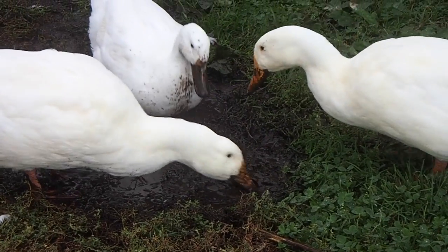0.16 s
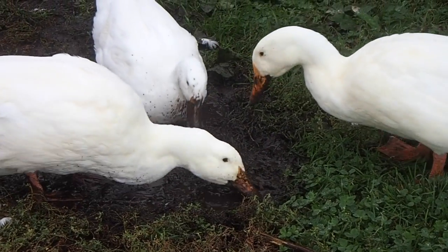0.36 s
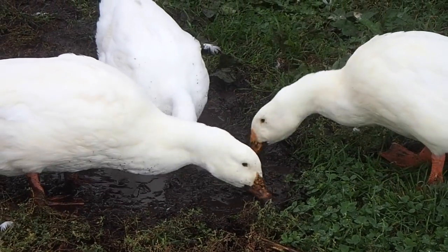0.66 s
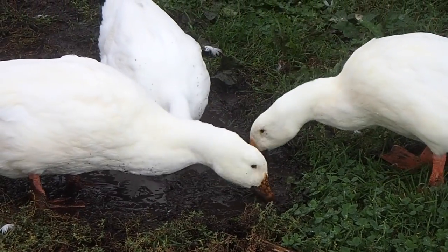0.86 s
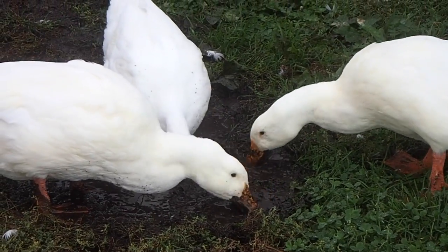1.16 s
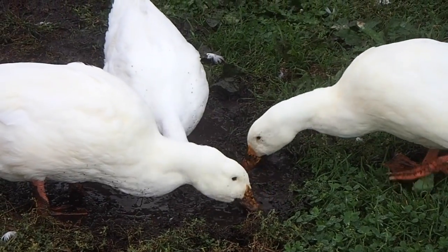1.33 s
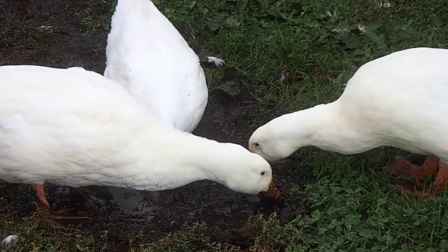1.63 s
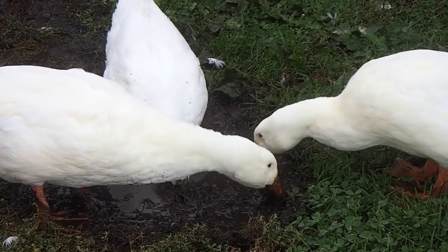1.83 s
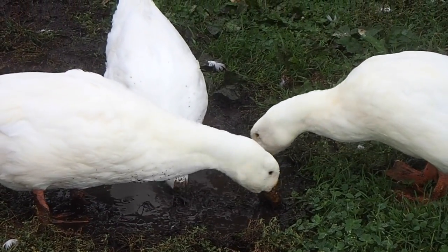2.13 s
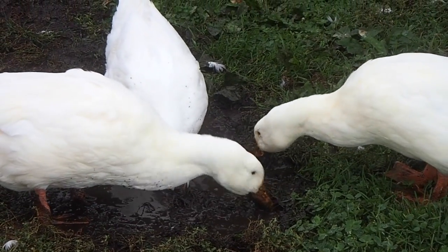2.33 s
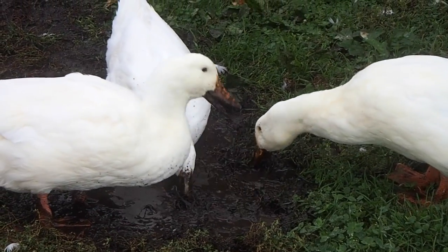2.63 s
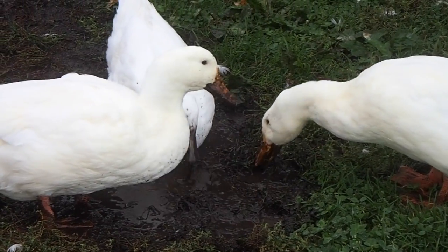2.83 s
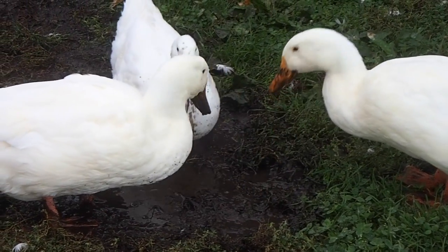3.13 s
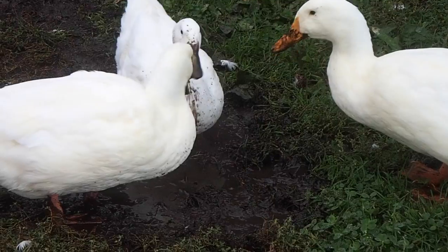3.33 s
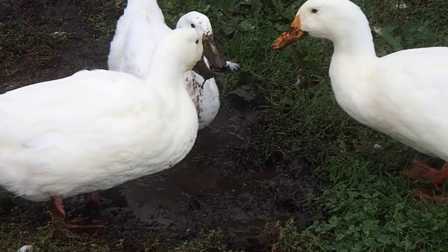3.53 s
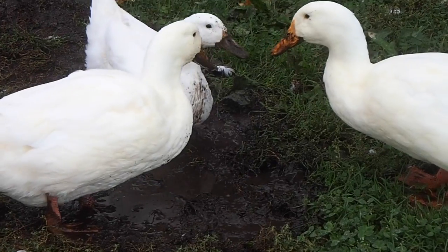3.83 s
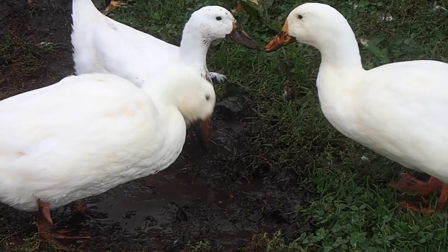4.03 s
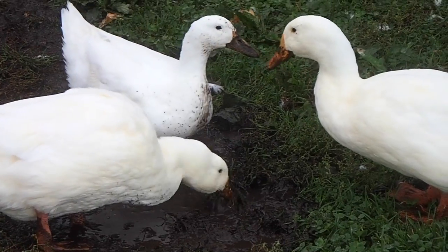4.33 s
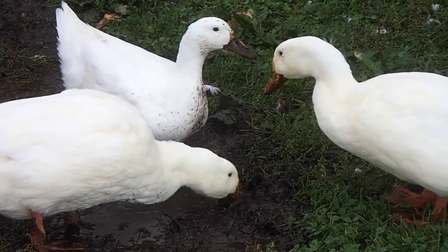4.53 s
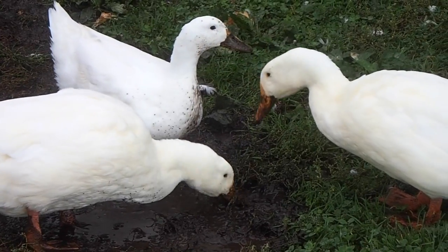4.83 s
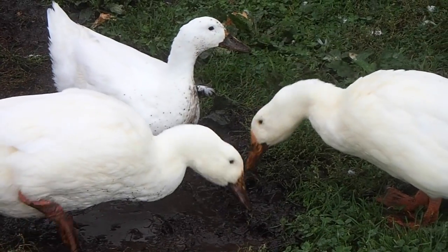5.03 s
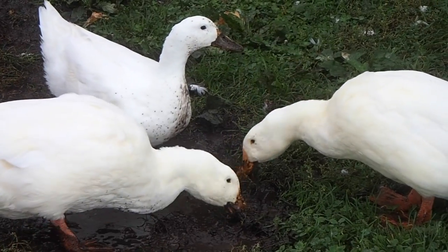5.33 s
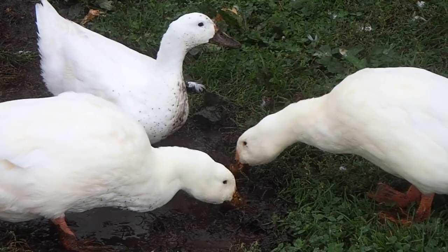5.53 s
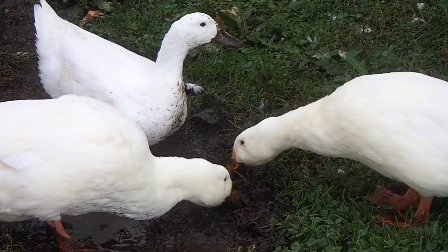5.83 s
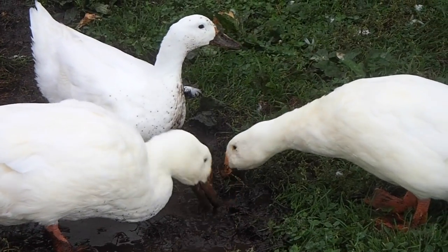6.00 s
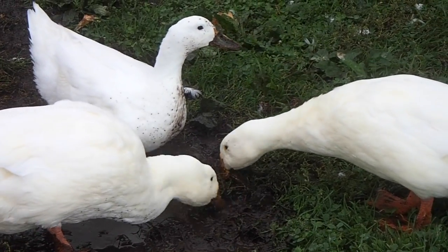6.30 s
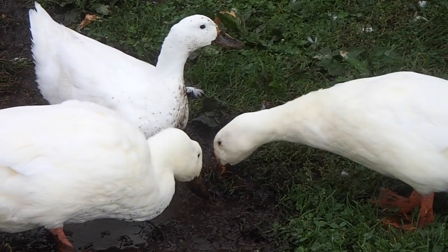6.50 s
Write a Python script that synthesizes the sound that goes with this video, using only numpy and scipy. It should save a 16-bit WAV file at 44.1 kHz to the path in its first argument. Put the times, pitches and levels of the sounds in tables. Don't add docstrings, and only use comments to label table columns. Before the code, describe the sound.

Three ducks dabble in a muddy puddle outdoors, very close to a small camera. Sharp wet smacks, plops and droplets build into a dense bout, pause for over a second while a drake rasps softly, then return in two more bouts. Far traffic rumbles, wind puffs lightly at the microphone and the lens motor ticks faintly early on.

```python
import sys
import numpy as np
from scipy import signal
from scipy.io import wavfile
from scipy.ndimage import uniform_filter1d

SR = 44100
rng = np.random.default_rng(int(sys.argv[2]) if len(sys.argv) > 2 else 0)


def store_pcm(level_fs):
    pcm = np.round(np.clip(level_fs, -1, 1) * 32767).astype(np.int16)
    wavfile.write(sys.argv[1], SR, np.atleast_2d(pcm).T)


def ratio_of_db(decibels):
    return 10 ** (np.asarray(decibels, float) / 20)


N = 293706

# pitch_hz, gain_db
CAVITY = [(2000, -9.5), (2800, -17), (3400, -12), (4180, -27.5), (4650, -6.5), (5300, -4), (5900, -8.5),
          (6350, -12), (7200, -15.5), (8000, -11.5), (9200, -25.5), (15600, -41.5), (16900, -70)]


def evened(x):
    return x / np.sqrt(np.mean(x ** 2) + 1e-20)


def read(points, hz):
    f, value = np.transpose(points)
    return np.interp(np.log(hz + 1), np.log(f + 1), value)


def add(mix, s, sound):
    part = mix[..., round(s * SR):][..., :sound.shape[-1]]
    part += sound[..., :part.shape[-1]]


def resonate(x, hz, width):
    turn = np.exp(2j * np.pi * np.cumsum(hz * np.ones(len(x))) / SR)
    r = np.exp(-np.pi * width / SR)
    return 2 * (turn * signal.lfilter([1 - r], [1, -r], x / turn)).real


def coloured(x, points):
    hz = abs(np.fft.fftfreq(4096, 1 / SR))
    log_gain = np.log(ratio_of_db(uniform_filter1d(read(points, hz), size=7, mode="wrap")))
    taps = np.fft.ifft(np.exp(np.conj(signal.hilbert(log_gain)))).real[:2048]
    return signal.oaconvolve(x, taps[None], axes=1)[:, :N]


def placed(x, pan_db):
    return x * ratio_of_db(np.array([[pan_db / 2], [-pan_db / 2]]))


def burst(t, length, hz, noise, wetness):
    shape = t / length * np.exp(1 - t / length)
    tone = np.sin(2 * np.pi * hz * t * (1 + 0.0055 * t / length))
    fuzz = evened(resonate(noise, hz, 0.44 * hz)) / np.sqrt(2)
    wet = np.clip(wetness * length / 0.00088, 0, 1)
    return shape * ((1 - wet) * tone + wet * fuzz), shape


def yard():
    # pitch_hz, level_db
    rumble_curve = [(25, -12), (70, -16.5), (120, 0), (200, -10), (300, -8), (700, -15), (1400, -18),
                    (2600, -42.5)]
    # pitch_hz, likeness (0 to 1)
    likeness = [(60, 0.41), (125, 1), (250, 0.86), (1000, 0.96), (2500, 0.76)]
    # pitch_hz, width_hz, level_db, start_s, end_s
    engines = [
        (71.2, 11.6, -56, 0.048, 7),
        (124, 49, -58, 0.17, 7),
        (161.3, 12.4, -58, 0.17, 3.1),
        (291, 27, -59.5, 0.064, 3.7),
        (486, 3.9, -59, 0.5, 1.01),
    ]
    frames, hz = N // 512 + 5, np.fft.rfftfreq(2048, 1 / SR)
    a, b, c, d, patches = rng.standard_normal((frames, 1025, 5)).T
    patches = evened(uniform_filter1d(uniform_filter1d(patches, 4, 0), 12, 1))
    swell = evened(uniform_filter1d(rng.standard_normal(frames), 30))

    same = np.clip(read(likeness, hz), -1, 1)[:, None]
    left = a + 1j * b
    right = same * left + np.sqrt(1 - same ** 2) * (c + 1j * d)
    z = np.array([left, right])
    z *= ratio_of_db(read(rumble_curve, hz)[:, None] + 2.0 * patches + 0.56 * swell)
    out = ratio_of_db(-37.0) * evened(signal.istft(z, nperseg=2048, noverlap=1536)[1][:, :N])

    now = np.arange(N) / SR
    for f, width, db, start, end in engines:
        fade = np.clip(np.minimum(now - start, end - now) / 0.14 + 1, 0, 1)
        out += ratio_of_db(db + 15) * evened(resonate(rng.standard_normal(N), f, width)) * fade
    return out


def crackle():
    # time_s, level_db
    busyness = [(0, -51), (.6, -45), (2.2, -39.5), (2.8, -51.5), (4.15, -55), (4.5, -39), (4.85, -50),
                (5.15, -48), (5.6, -37.5), (6.1, -46.5), (6.66, -45.5)]
    # pitch_hz, gain_db
    mud_curve = [(700, -34), (1200, -8), (5000, -4.5), (9000, -4.5), (15700, 12), (15860, -37)]
    clumps = uniform_filter1d(uniform_filter1d(rng.standard_normal(N), 300), 300)
    clumps = np.clip(evened(clumps), -2, 1.6)
    struck = rng.random(N) < 700 / SR
    size = ratio_of_db(3.5 * np.minimum(rng.exponential(1, N), 2.8)) * struck * ratio_of_db(5.0 * clumps)

    kind, t, grains = rng.integers(0, 24, N), np.arange(300) / SR, np.zeros((2, N))
    for k, hz in enumerate(np.geomspace(900, 14000, num=24)):
        length = rng.uniform(0.23, 4.7) / hz
        grain = burst(t, length, hz, rng.standard_normal(300), wetness=0.79)[0]
        train = signal.oaconvolve(size * (kind == k), grain / np.linalg.norm(grain))[:N]
        grains += placed(train, 0.32 * rng.standard_normal())

    bright = np.diff(rng.standard_normal((2, N + 1)))
    smear = (rng.standard_normal(N) + 1.5 * bright) * ratio_of_db(1.3 * clumps)
    s, db = np.transpose(busyness)
    busy_db = np.interp(np.arange(N) / SR, s, db)
    smear_db = 0.35 * (busy_db + 49.5) - 39.5
    return coloured(ratio_of_db(busy_db + 6.5) * evened(grains) + ratio_of_db(smear_db) * smear, mud_curve)


def focus(count):
    # pitch_hz, peak_db
    body_modes = [(3250, -43), (2500, -49), (5300, -44), (8000, -54)]
    start_s, step_s = 0.0506, 1.001 / 15
    out, t = np.zeros((2, N)), np.arange(400) / SR
    for k, noise in enumerate(rng.standard_normal((count, 400))):
        tick = np.zeros(len(t))
        for hz, db in body_modes:
            tick += ratio_of_db(db - read(CAVITY, hz)) * burst(t, 0.0007, hz, noise, wetness=0.83)[0]
        add(out, start_s + k * step_s - .001, placed(tick, 0.1))
    return out


def rasp(start, length, db, hz, pipe_hz):
    # factor on the throat pitch, width_hz, level_db
    throat_modes = [(1.0, 200, 3), (1.3, 300, -1), (1.7, 350, -5), (2.1, 350, -6)]
    top, end = start + 0.366 * length, start + length
    flaps_per_s = 71
    t = np.arange(start, end, 1 / SR)
    swell_db = np.interp(t, [start, top - .1 * length, top + .15 * length, end], [-9, -1, -1, -16])
    effort_db = db + swell_db
    wobble = evened(uniform_filter1d(rng.standard_normal(len(t)), 500))
    turns = np.cumsum(flaps_per_s * ratio_of_db(.12 * (effort_db + 46)) * (1 + .12 * wobble)) / SR
    phase = turns % 1
    strength, detune, pipe_db = rng.standard_normal((3, 40))[:, turns.astype(int)]
    puff = .27 + ratio_of_db(1.4 * strength) * np.sin(np.pi * phase ** .7) ** 2

    slide = hz * (1 + .34 * (phase - .62) + .04 * wobble + .06 * detune + .008 * swell_db)
    whistle = np.sqrt(2) * np.sin(2 * np.pi * np.cumsum(slide) / SR)
    pipe_slide = pipe_hz * (1 + 0.041 * wobble + 0.147 * (phase - .7))
    pipe_level = phase * ratio_of_db(6.5 + 3.0 * pipe_db + .5 * swell_db)
    windpipe = np.sin(2 * np.pi * np.cumsum(pipe_slide) / SR) * pipe_level

    air, throat = rng.standard_normal(len(t)), np.zeros(len(t))
    for f, width, mode_db in throat_modes:
        ring = resonate(resonate(air, f * slide, width), f * slide, 2 * width)
        throat += ratio_of_db(mode_db + (f - 2.0) * .5 * swell_db) * evened(ring)
    hiss = resonate(resonate(air, 5200 + 200 * wobble, 500), 5450 + 200 * wobble, 500)
    nostrils = ratio_of_db(.9 * swell_db) * evened(hiss)
    voice = evened(puff * (2.1 * (whistle + windpipe) + throat) + np.sqrt(puff) * nostrils)
    return ratio_of_db(effort_db + 17.5) * voice * signal.windows.tukey(len(t), .15)


def drake():
    # start_s, length_s, effort_db, throat_hz, windpipe_hz
    calls = [(0.171, 0.083, -56.5, 1600, 2040), (0.263, 0.093, -50.5, 1498, 1900),
             (0.462, 0.096, -48.5, 1474, 1800), (0.698, 0.076, -51, 1565, 2150),
             (0.898, 0.15, -53.5, 1346, 1800), (1.186, 0.081, -48.5, 1560, 1900),
             (1.922, 0.036, -53, 1670, 2040), (2.231, 0.034, -51, 1770, 2060),
             (2.456, 0.057, -53, 1530, 2040), (2.65, 0.084, -49, 1484, 2450),
             (2.841, 0.062, -53, 1380, 2000), (3.012, 0.077, -46, 1500, 2170),
             (3.058, 0.084, -50, 1700, 2060), (3.212, 0.086, -46.5, 1678, 2050),
             (3.496, 0.089, -45, 1750, 2080), (3.621, 0.087, -52.5, 1360, 2350),
             (3.698, 0.12, -40.5, 1620, 2084), (4.006, 0.073, -46.5, 1700, 2186),
             (4.141, 0.09, -46.5, 1400, 1820), (4.36, 0.0814, -47, 1400, 2130),
             (4.545, 0.089, -52, 1422, 1850), (4.762, 0.11, -46.5, 1660, 2200),
             (4.98, 0.089, -52.5, 1480, 2200), (5.109, 0.099, -49, 1600, 2050),
             (5.285, 0.093, -52, 1720, 2040), (5.722, 0.06, -51, 1530, 2040),
             (6.086, 0.085, -56.5, 1523, 2040), (6.341, 0.079, -58.5, 1400, 2040),
             (6.574, 0.082, -52, 1465, 2010)]
    voice = np.zeros(N)
    for call in calls:
        add(voice, call[0], rasp(*call))
    t = np.arange(4000) / SR
    tail = rng.standard_normal((2, 4000)) * ratio_of_db(-60 * t / 0.76) * (t > .003)
    tail /= np.linalg.norm(tail[0])
    return voice + ratio_of_db(-47.0) * signal.oaconvolve(voice[None], tail, axes=1)[:, :N]


def wind():
    # time_s, level_db
    puff_rows = [(0.2, -55), (0.82, -40.5), (0.97, -48), (1.37, -39), (2.13, -47), (2.28, -42),
                 (2.6, -42.5), (3.12, -57), (3.27, -42), (4.22, -41), (5.169, -47)]
    # pitch_hz, gain_db
    gust_curve = [(15, -17), (45, 11.5), (150, -1.5), (400, -42), (1500, -105)]
    now = np.arange(N) / SR
    puffs = sum(ratio_of_db(db) * np.exp(-((now - s) / 0.058) ** 2) for s, db in puff_rows)
    lumps = evened(uniform_filter1d(uniform_filter1d(rng.standard_normal(N), 2500), 2500))
    air = evened(coloured(rng.standard_normal((2, N)), gust_curve)) * ratio_of_db(np.array([[-1.5], [1.5]]))
    return air * (puffs + ratio_of_db(-57.0 + 4.9 * lumps))


def ticks():
    # time_s, peak_db, pitch_hz
    films = [(0.2597, -44, 8200), (0.5697, -41, 8160), (0.898, -41, 5100), (1.12, -39.5, 8200),
             (1.1422, -37, 8150), (1.2952, -35.5, 8150), (1.388, -41, 3450), (1.425, -35, 7500),
             (1.567, -40, 5280), (1.809, -37.5, 5400), (1.932, -37, 5500), (2.206, -30.5, 5520),
             (2.5519, -39.5, 3300), (3.8164, -46, 8400), (4.27, -40.5, 7800), (4.317, -43, 5430),
             (5.1972, -46.5, 10900), (5.3404, -39, 6460), (5.684, -32, 5300), (5.7593, -39, 7800),
             (5.777, -34, 8000), (5.8237, -42, 2880), (5.899, -49, 9500), (5.9697, -47, 2860),
             (2.79, -47.5, 2840), (6.2672, -46, 14470), (6.284, -44, 7750), (6.3094, -40, 8100),
             (4.282, -48, 2380), (6.546, -39, 8000), (0.3064, -47, 7800), (0.532, -47, 8050),
             (.5475, -48, 7840), (0.5633, -48, 7000), (0.6494, -44, 7450), (0.706, -47.5, 8600),
             (1.96, -37, 6200), (1.2471, -51, 9800), (1.5896, -47, 7500), (2.0142, -42, 7260),
             (.4865, -57, 8900), (4.229, -61, 8800), (4.256, -48, 7000), (4.6472, -42, 6400),
             (2.149, -46, 5500), (5.7502, -40, 7500), (6.145, -48, 8050), (6.2067, -50, 8800),
             (6.4615, -50, 7000), (6.471, -45, 7760), (6.506, -40, 5500), (1.8724, -40, 5400)]
    out, t = np.zeros((2, N)), np.arange(500) / SR
    for (s, db, hz), noise in zip(films, rng.standard_normal((len(films), 2, 500))):
        snap, shape = burst(t, 0.00078, hz, noise[1], wetness=0.72)
        splash = ratio_of_db(-19.0) * noise[0] * shape
        sound = (snap + splash) / ratio_of_db(max(read(CAVITY, hz), -26))
        add(out, s - .0006, placed(ratio_of_db(db + 11.5) * sound, 1.1 * noise[0, 0]))
    return out


def spatter():
    # time_s, peak_db, pitch_hz
    bubbles = [(0.584, -31.5, 3400), (1, -36, 3100.0), (1.046, -33, 3400), (1.049, -45, 1130),
               (1.0517, -37, 3450), (1.1427, -40, 3190.0), (1.224, -42, 2810), (1.2848, -39, 3380.0),
               (1.2857, -46, 1000), (1.3094, -34, 815), (1.3178, -38, 2980), (1.32, -33, 1800),
               (1.586, -44, 3330), (1.6525, -42, 2990.0), (1.658, -39, 2800), (1.6637, -40, 3360),
               (1.6986, -40.5, 2690.0), (1.718, -48, 3380.0), (1.872, -35, 3420), (1.931, -33, 1810.0),
               (1.961, -38, 1340.0), (1.9791, -37, 3430), (2.0886, -37, 1040), (2.161, -44, 1250),
               (2.251, -36, 1740.0), (2.2902, -50, 2730.0), (2.368, -49, 2760), (2.3799, -37.5, 1150),
               (2.4794, -35, 1930), (4.34, -33.5, 1800), (4.3862, -29.5, 2550), (4.3952, -32, 1460),
               (4.3982, -48, 2430.0), (4.4044, -40, 1360), (4.4073, -38, 1490), (4.425, -45, 1270.0),
               (4.4617, -39, 3200), (4.469, -42, 1160.0), (4.6246, -47, 3060), (4.726, -32.5, 3230),
               (5.3153, -47, 3470.0), (5.3346, -38, 2950.0), (5.371, -32, 3300), (5.371, -38, 1690),
               (5.376, -38.0, 3400.0), (5.4397, -27.5, 3400.0), (5.4476, -41, 2110.0), (5.562, -36, 3340.0),
               (5.5812, -41, 2420), (5.5818, -35, 2130), (5.651, -32.5, 3500), (5.679, -34.0, 1740.0),
               (5.85, -27.5, 3170), (5.8635, -33, 1230), (5.872, -36, 1970), (5.9811, -46, 3540),
               (6.523, -35, 1690), (6.549, -44, 2610.0)]
    # time_s, peak_db, pitch_hz
    droplets = [(0.2627, -39, 7700), (0.3336, -29, 7250), (0.765, -41, 10200), (0.9957, -33.0, 7000),
                (0.9998, -24, 5340.0), (1.081, -32, 7860), (1.14, -48, 13700), (1.1989, -39, 8000),
                (1.22, -34, 7750.0), (1.2205, -24.5, 4980), (1.2853, -49, 14100.0), (1.3084, -41, 7800.0),
                (1.382, -36, 7450), (1.422, -43.5, 14470.0), (1.6637, -34, 6550), (1.6924, -29, 5100),
                (1.7847, -28.5, 5440), (1.8369, -37, 8070.0), (1.8504, -33, 5400.0), (1.8728, -32, 7050),
                (1.892, -38, 7800), (1.978, -27, 5440), (1.9971, -44.0, 10420.0), (2.1047, -26, 5300),
                (2.2309, -40, 7670.0), (2.231, -25, 5100), (2.2376, -21, 5240), (2.2475, -26, 5450.0),
                (2.2896, -38, 7770.0), (2.29, -32.0, 5320.0), (2.3798, -39.5, 9800), (2.5024, -38, 13350.0),
                (4.4206, -21.5, 7800), (4.4977, -29.5, 7650), (4.567, -35, 6850), (4.5699, -34, 5330),
                (4.637, -41.5, 9460), (4.6883, -38, 4640), (5.207, -37, 7990.0), (5.307, -37, 6520.0),
                (5.3124, -36, 5300), (5.335, -35, 5380.0), (5.3733, -23, 5500), (5.4012, -28.5, 5330),
                (5.4682, -41.5, 11900), (5.481, -29, 5470.0), (5.5188, -28, 5330), (5.6119, -42.5, 10900.0),
                (5.6872, -34, 8360), (5.8173, -24.5, 5230), (5.972, -32, 8000), (6.2835, -32, 5150),
                (6.3422, -39.5, 8350), (6.6231, -34, 7900), (6.6355, -29, 5000)]
    out, t, rows = np.zeros((2, N)), np.arange(500) / SR, bubbles + droplets
    for (s, db, hz), noise in zip(rows, rng.standard_normal((len(rows), 500))):
        length = 0.00057 + .7 / hz
        blip = burst(t, length, hz, noise, wetness=0.65)[0]
        level = ratio_of_db(db - read(CAVITY, hz) + 4.5)
        add(out, s - length - .0003, placed(level * blip, 0.21 + 0.37 * noise[0]))
    return out


def squelches():
    # start_s, length_s, level_db, low body against the fizz_db
    squeezes = [(0.294, 0.013, -51, -8), (0.338, 0.025, -50, -15), (1.134, 0.018, -39, -18),
                (1.295, 0.023, -41, -1), (2.159, 0.012, -32, -22), (2.225, 0.017, -36.5, -8.5),
                (2.291, 0.013, -33.5, -0.5), (4.343, 0.015, -47, -5), (4.686, 0.013, -42.5, 9),
                (5.305, 0.026, -40.5, -14), (5.441, 0.011, -37, -6), (5.769, 0.011, -39, -12),
                (5.88, 0.011, -41.5, -2), (5.966, 0.03, -39, -16), (6.262, 0.011, -40, -15),
                (6.548, 0.0094, -41, -6), (3.818, 0.022, -45.5, -16), (1.799, 0.012, -42, 0.5),
                (1.882, 0.0078, -30, -9), (2.778, .01, -47, 3.5)]
    out = np.zeros((2, N))
    for (s, length, db, body_db), noise in zip(squeezes, rng.standard_normal((len(squeezes), 3, 1500))):
        fizz, body, spits = noise[:, :round(length * SR)]
        wet = fizz + ratio_of_db(body_db) * evened(resonate(body, 1400, 1800))
        sound = wet * ratio_of_db(3.7 * evened(uniform_filter1d(spits, 40)))
        add(out, s, placed(ratio_of_db(db + 10.0) * sound * signal.windows.tukey(len(fizz), .4), 0.27))
    return out


def smacks():
    # time_s, peak_db, sharp tick against the peak_db
    bill_smacks = [(0.995, -22.5, -46), (1.0488, -21, -22), (1.174, -18.5, -29), (1.1982, -23, -35),
                   (1.2155, -26, -31), (1.285, -33, -8), (1.3578, -18.5, -23), (1.4164, -22.5, -30),
                   (1.4445, -12.5, -40), (1.4534, -30.5, -4), (1.5195, -26, -38), (1.651, -30, -29),
                   (1.6565, -25.5, -12.5), (1.6638, -25, -23), (1.862, -16.5, -40), (1.918, -17, -26),
                   (1.9805, -19.5, -31), (1.9878, -13, -24), (2.0878, -15.5, -46), (2.1008, -18, -40),
                   (2.1652, -13, -23), (2.2273, -24, -38), (2.2345, -19, -27), (2.2934, -15, -24),
                   (2.299, -21.5, -22), (2.4335, -14, -25), (2.5013, -7, -33), (2.6128, -22, -28),
                   (2.6345, -7.5, -48), (2.789, -38, -11),
                   (0.3312, -21, -18), (0.338, -30, -13), (0.4123, -24, -24), (0.4652, -30, -21),
                   (0.5838, -24.5, -25), (0.63, -27, -22), (0.659, -28.5, -18), (0.7596, -28, -30),
                   (0.764, -28, -14), (0.9174, -25, -38), (1.785, -46, -37), (2.4304, -15, -37),
                   (2.487, -24, -29), (4.2777, -26, -41), (4.343, -21.5, -22.5), (4.347, -26, -16),
                   (4.385, -21, -25), (4.4168, -24, -16), (4.4206, -18, -18.5), (4.468, -20.5, -38),
                   (4.4969, -29, -14), (4.54, -29, -22), (4.564, -21, -26), (4.579, -28, -27),
                   (4.638, -35, -6), (4.689, -23.5, -17), (4.727, -29, -7.5),
                   (5.2039, -32.5, -12), (5.2458, -38, -12), (5.3085, -23.5, -24), (5.318, -35, -27),
                  (5.369, -11, -48), (5.392, -29, -39), (5.399, -53, -25), (5.438, -23.5, -38),
                  (5.4466, -38, -23), (5.4735, -14.5, -32), (5.505, -22.5, -12.5), (5.574, -26.5, -32),
                  (5.585, -21, -38), (5.6124, -43, -20), (5.6497, -22, -33), (5.717, -17.5, -37),
                  (5.7212, -22, -33), (5.7831, -19.5, -21), (5.8119, -22.5, -19), (5.8487, -19, -23),
                  (5.8617, -11.5, -25), (5.9097, -14, -20), (5.914, -8, -22.5), (6.0565, -32, -16),
                  (6.2422, -20, -29), (6.271, -24.5, -9), (6.386, -26, -40), (6.5934, -18.5, -13.5),
                  (6.604, -28, -25), (6.629, -20.5, -23)]
    out, t = np.zeros((2, N)), np.arange(1200) / SR
    rows = bill_smacks
    for (s, db, tick_db), noise in zip(rows, rng.standard_normal((len(rows), 4, 1200))):
        pan, pitch, wetter, spread = rng.standard_normal(4)
        ms = 2.43 + 0.28 * spread
        length = max(ms - 1.1, .15) * 0.000696
        hz = 5400 + 300 * np.tanh(pitch)
        snap, shape = burst(t, length, hz, noise[3], wetness=0.51)
        sharp = np.diff(np.diff(noise[0], prepend=0), prepend=0)
        tick = ratio_of_db(tick_db + 25.5) * sharp * shape ** 2

        spits = noise[1] + 2.3 * resonate(noise[3], hz, 1000)
        spits = spits * ratio_of_db(3.5 * evened(uniform_filter1d(noise[2], 50)))
        splutter_db = -9.5 - 0.64 * (db + 26) + 3.0 * np.tanh(wetter)
        splutter = ratio_of_db(splutter_db) * spits * ratio_of_db(-60 * t / 0.074) * np.minimum(t / 0.004, 1)

        sound = shape * snap / ratio_of_db(max(read(CAVITY, hz), -9)) + tick + splutter
        add(sound, .0018, ratio_of_db(-14.0) * sound)
        add(out, s - length - .0004, placed(ratio_of_db(db + 2.5) * sound, 0.38 + 1.3 * pan))
        suck = splutter[299::-1] * t[:300] / t[299]
        add(out, s - length - t[299], ratio_of_db(db + 2.0) * suck)
    return out


def plops():
    # time_s, peak_db, pitch_hz, length_ms
    pockets = [(0.6302, -20.5, 2860, 1.53), (1.0812, -24.5, 810, 3.8), (1.173, -19.5, 3400, 2),
               (1.296, -26, 1890, 3.5), (1.3155, -15.5, 1870, 1.44), (1.3564, -16.5, 1320, 4.7),
               (1.4452, -14, 1000, 1.7), (1.4526, -19, 2920, 1.6), (1.6578, -14.5, 1280, 1.58),
               (1.7754, -27, 1750, 4.5), (1.9193, -15.5, 1660, 2.2), (1.9875, -27, 960, 5.9),
               (2.101, -16, 3280, 1.2), (2.2963, -23.5, 940, 4.87), (2.4298, -21.5, 3470, 3.1),
               (2.5012, -11, 1210, 1.9), (2.557, -19.5, 1800, 2.3), (2.6339, -31, 3440, 2.3),
               (4.384, -32, 1760, 4.4), (4.5412, -22, 920, 5), (4.6897, -16, 860, 2),
               (5.3139, -27, 1770, 3), (5.2106, -23, 2900, 1.9), (5.4698, -16, 1660, 1),
               (5.5102, -14.5, 1640, 1.66), (5.6108, -19.5, 1970, 3.1), (5.639, -21, 1660, 2.5),
               (5.717, -11, 1510, 1.7), (5.8505, -12.5, 1880, 2.9), (6.0174, -18.5, 2420, 1.42)]
    out, t = np.zeros((2, N)), np.arange(1200) / SR
    for (s, db, hz, ms), noise in zip(pockets, rng.standard_normal((len(pockets), 2, 1200))):
        length = max(ms - 1.1, .3) * .0005
        plop, shape = burst(t, length, hz, noise[1], wetness=.07)
        clean = np.exp(-(length * hz / 3.6) ** 2)
        slap = ratio_of_db(0.1) * evened(resonate(noise[0], 1.3 * hz, 1.2 * hz)) * shape * clean
        sound = plop / ratio_of_db(read(CAVITY, hz)) + slap
        add(out, s - length, placed(ratio_of_db(db - 8.0) * sound, 0.12 * noise[0, 0]))
    return out


def scene():
    background = yard() + crackle() + focus(count=33) + drake()
    return background + ticks() + spatter() + squelches() + smacks() + plops()


def band_limit(x):
    return signal.sosfilt(signal.butter(12, 16820, fs=SR, output="sos"), x)


def record(dry):
    # pitch_hz, gain_db
    hiss_curve = [(1000, 13.5), (4000, -28), (7000, 9), (12000, 1.5), (15720, 2), (15860, -64)]
    hiss = rng.standard_normal((2, N)) + 0.054 * rng.standard_normal(N)
    heard = coloured(dry, CAVITY) + ratio_of_db(-58.5) * evened(coloured(hiss, hiss_curve)) + wind()
    heard = signal.lfilter(*signal.iirnotch(6130, 50, fs=SR), heard)
    return band_limit(heard)


dry = scene()
out = record(dry)
store_pcm(out)
```